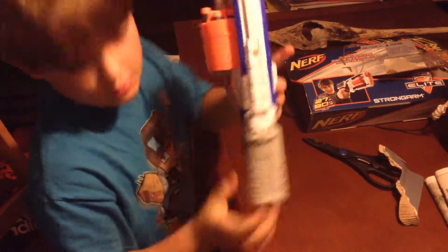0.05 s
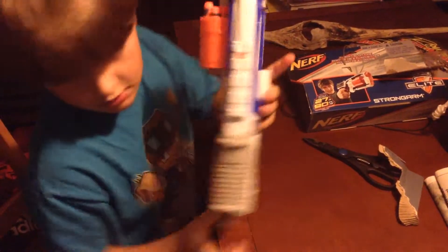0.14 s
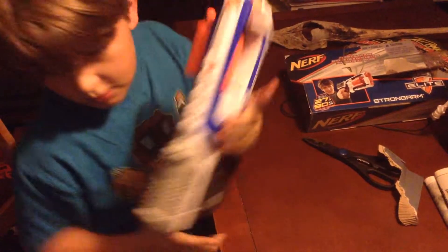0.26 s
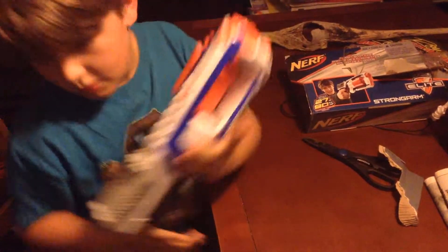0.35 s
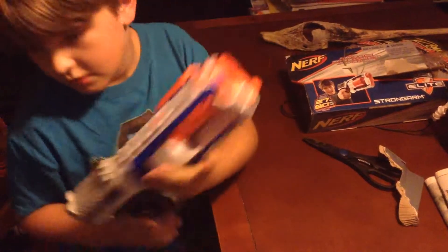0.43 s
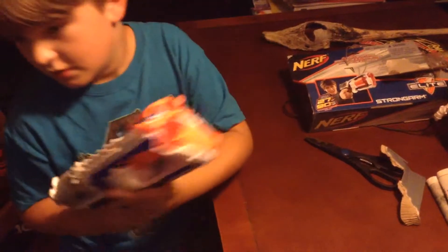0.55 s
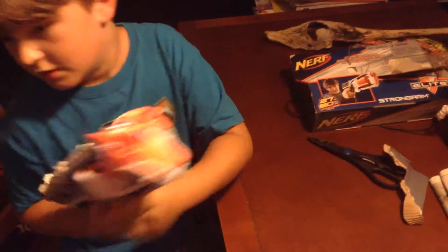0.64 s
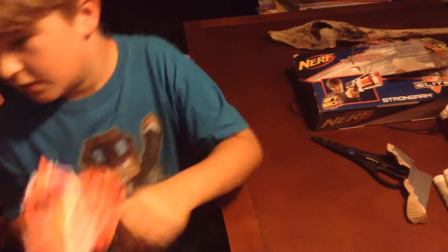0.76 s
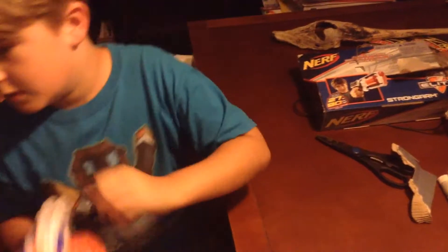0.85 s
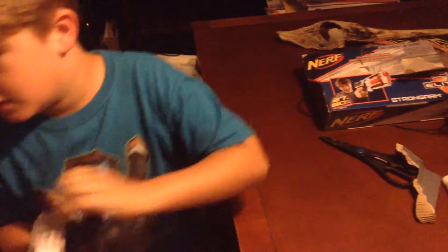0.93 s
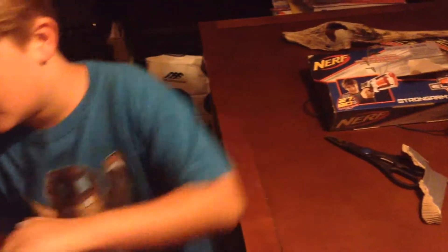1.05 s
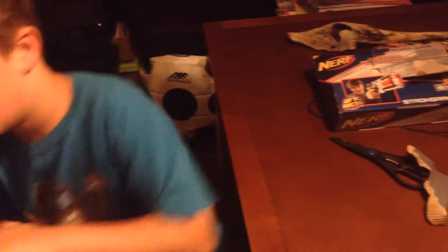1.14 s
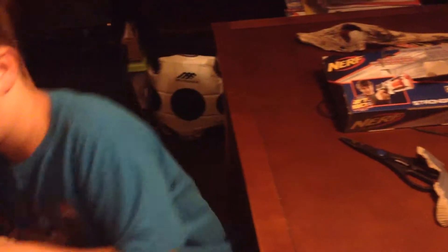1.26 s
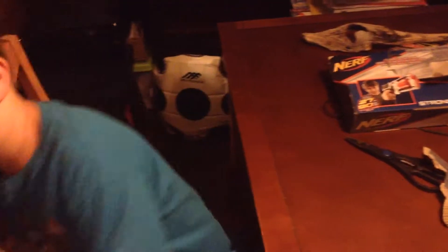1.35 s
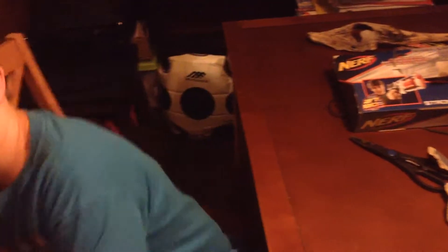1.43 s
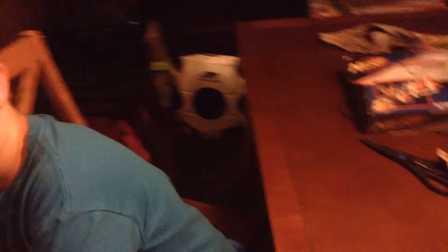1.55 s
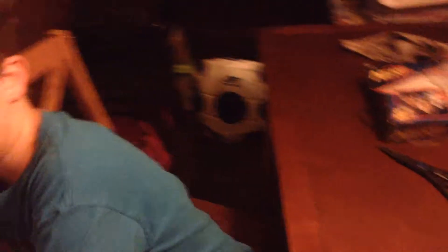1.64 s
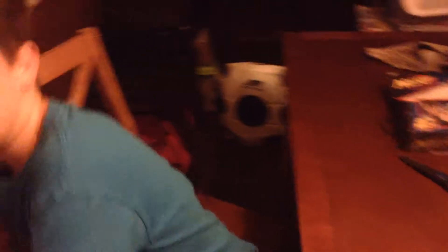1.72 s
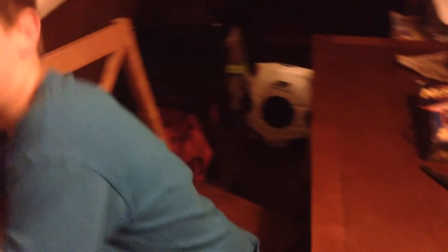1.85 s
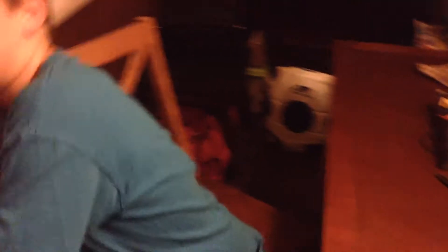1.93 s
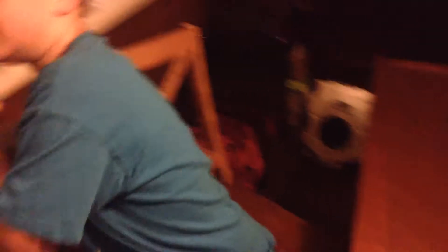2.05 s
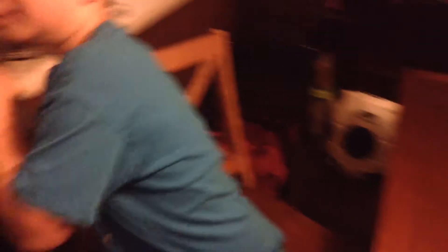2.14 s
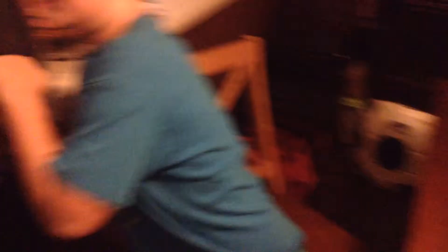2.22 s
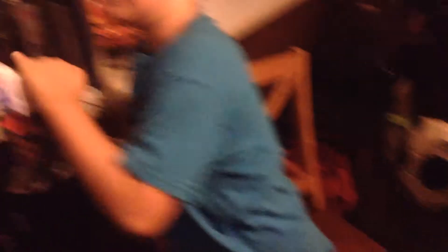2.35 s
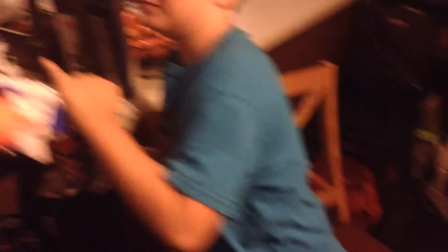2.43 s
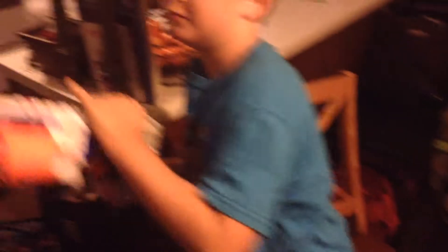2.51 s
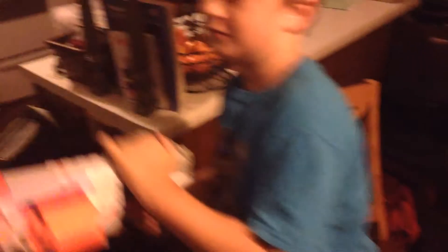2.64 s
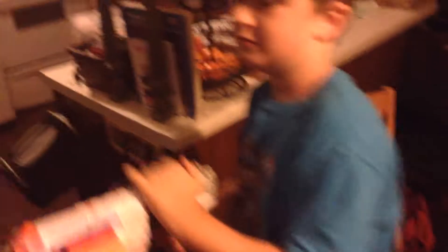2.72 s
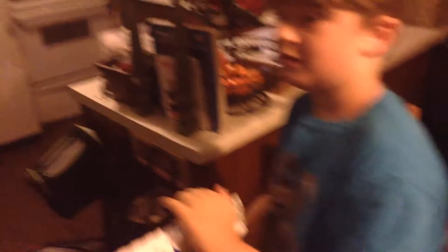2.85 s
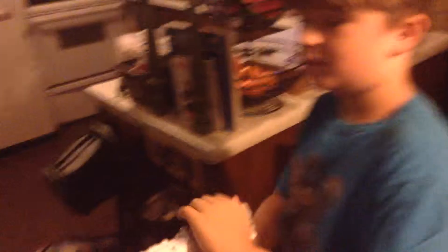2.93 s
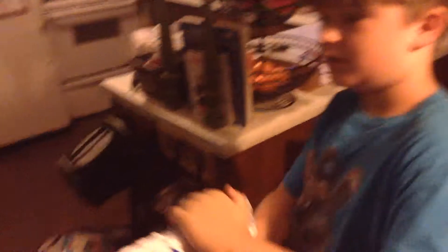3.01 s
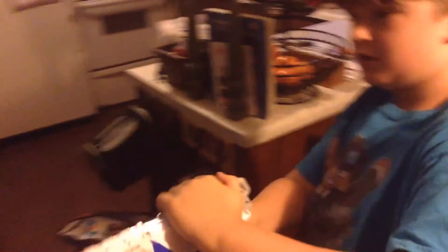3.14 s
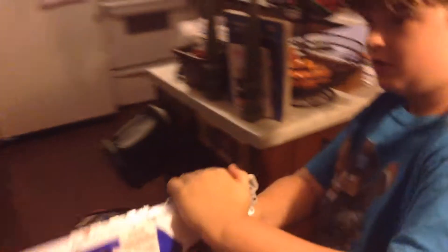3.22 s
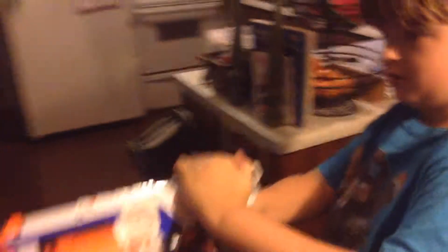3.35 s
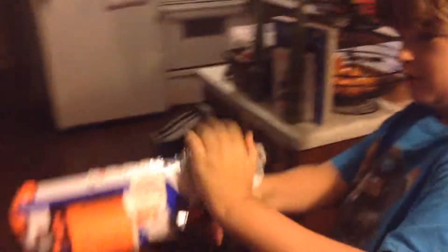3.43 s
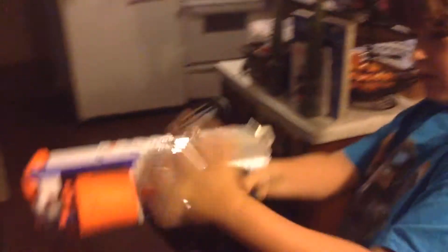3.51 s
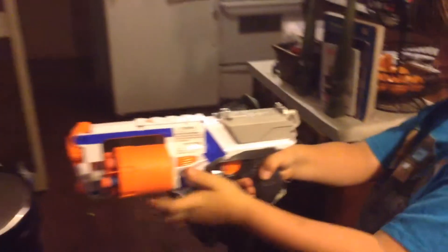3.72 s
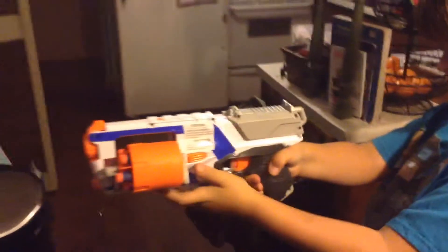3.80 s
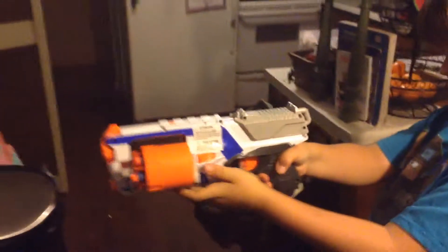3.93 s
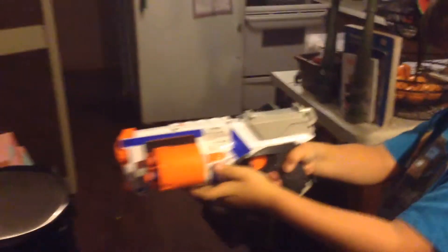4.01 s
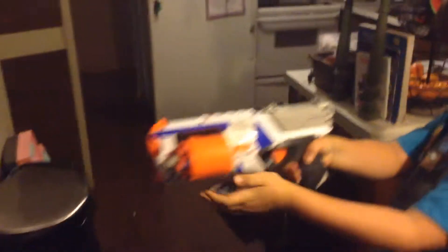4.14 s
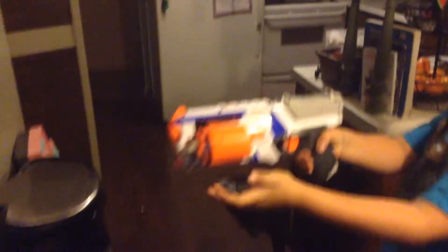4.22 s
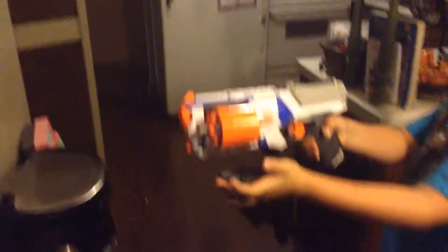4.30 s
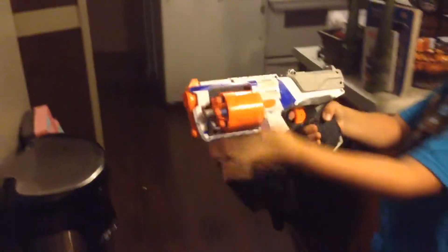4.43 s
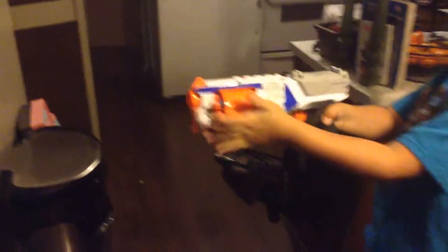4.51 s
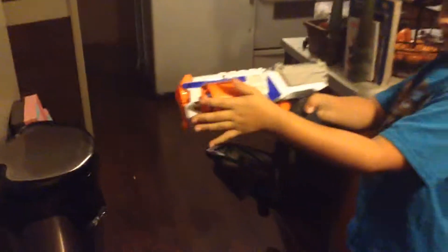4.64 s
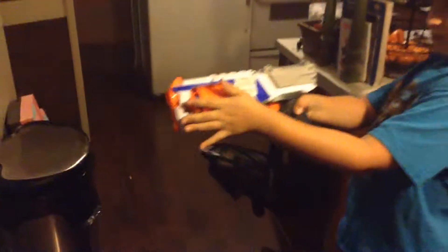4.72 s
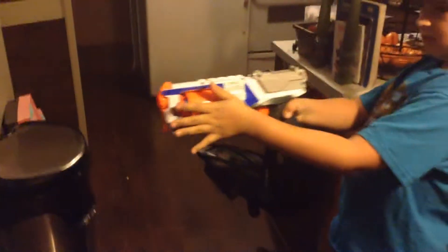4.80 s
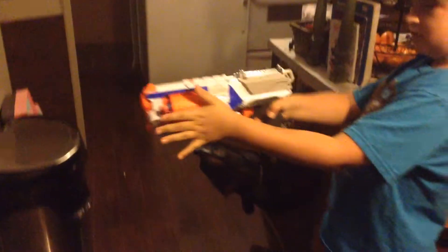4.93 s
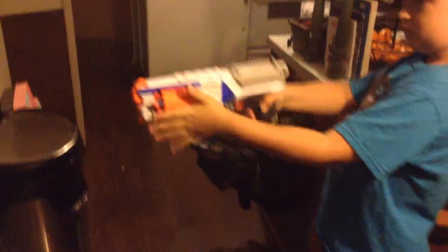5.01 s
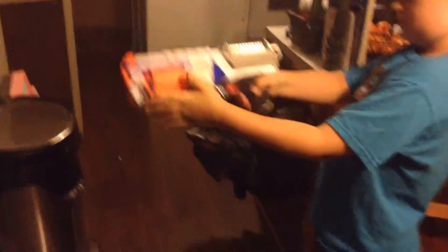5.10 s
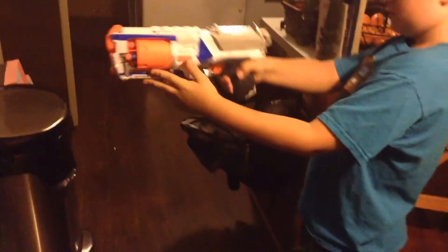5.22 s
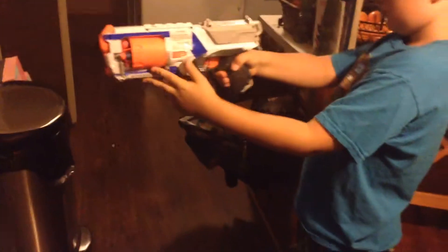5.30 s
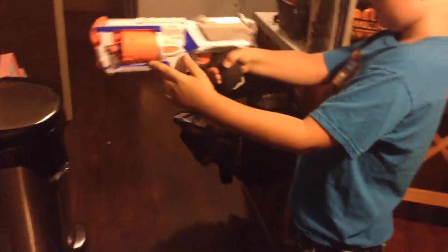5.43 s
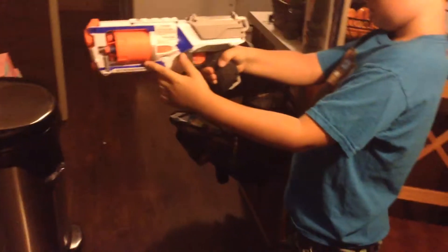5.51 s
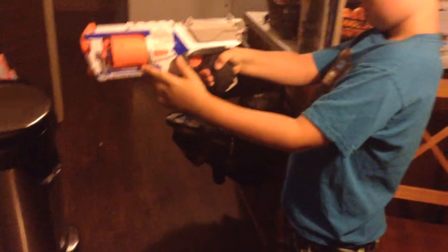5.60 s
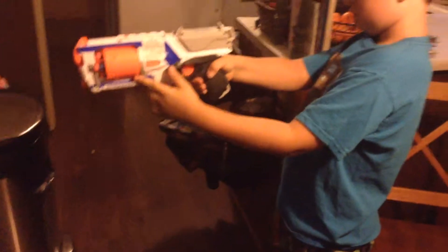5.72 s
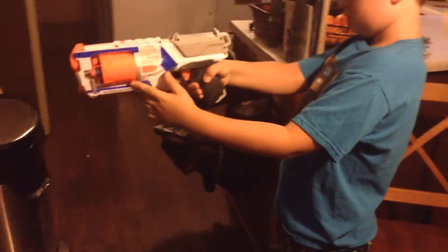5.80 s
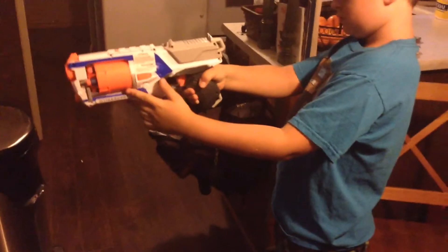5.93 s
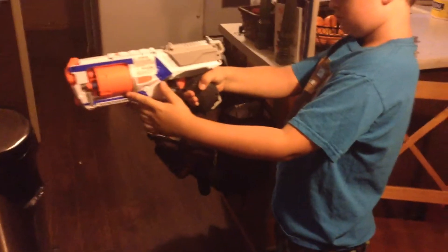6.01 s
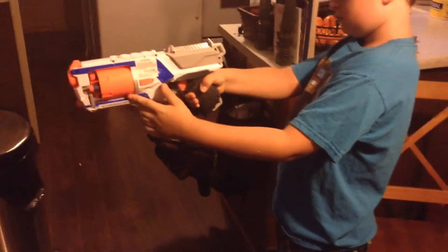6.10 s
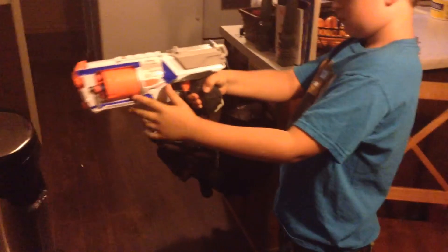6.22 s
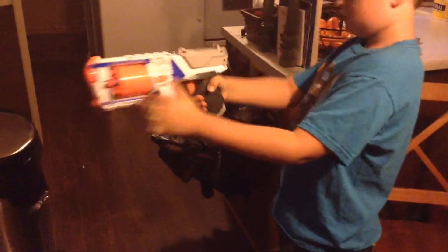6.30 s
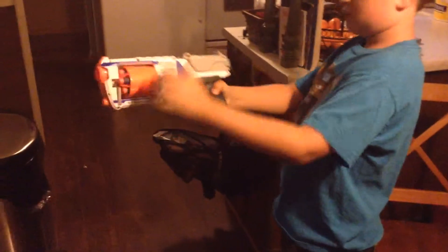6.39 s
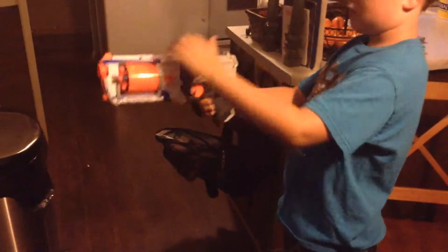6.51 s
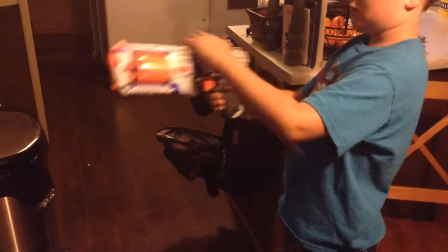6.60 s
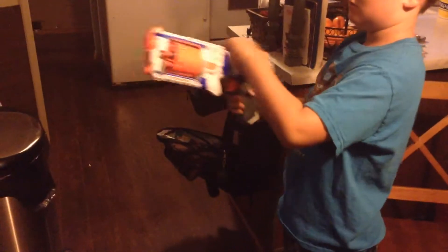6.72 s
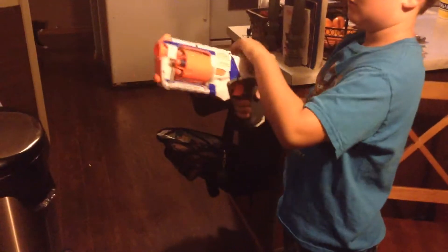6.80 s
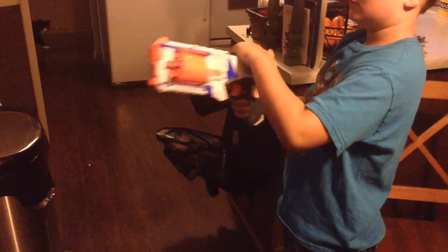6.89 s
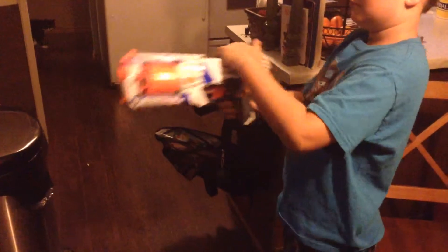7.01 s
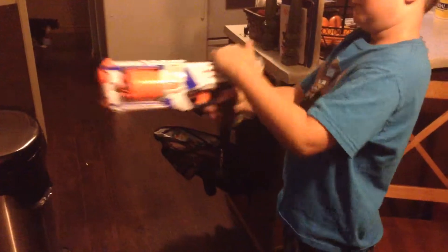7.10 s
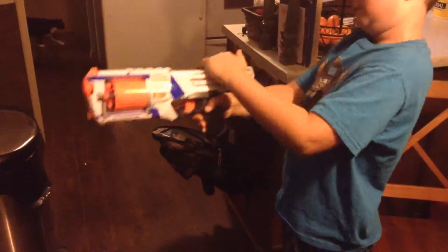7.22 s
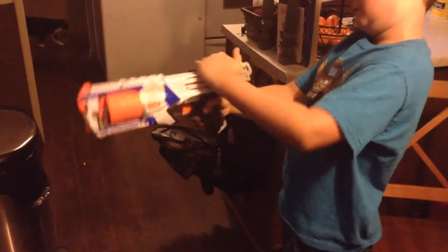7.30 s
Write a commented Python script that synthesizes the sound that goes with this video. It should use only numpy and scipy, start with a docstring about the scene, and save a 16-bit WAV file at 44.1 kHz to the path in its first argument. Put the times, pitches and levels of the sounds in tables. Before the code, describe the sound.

Sharp plastic slams and a rattling cylinder catch sound in a hard-walled room, among small ticks, brushing hands and quiet room tone.

```python
"""Loud plastic clacks, light ticks, scrapes and soft bumps are heard in a kitchen, over quiet room tone.
A child handles a foam-dart revolver: the slide, latch, cylinder and plunger slam, and loose parts tick.
Each blow is a short burst of chattering noise that rings the hollow shell and the part that is struck.
Scrapes and brushing are uneven noise; bumps ring one dull tone; the phone's case clicks without echo.
Hard walls give every sound of the blaster and hands a short bright tail."""
import sys
import numpy as np
from scipy import signal
from scipy.fft import rfft, irfft
from scipy.io import wavfile
from scipy.ndimage import uniform_filter1d

SR = 44100
rng = np.random.default_rng(int(sys.argv[2]) if len(sys.argv) > 2 else 0)


def file_out(sig):
    """Save sig as 16-bit WAV at sys.argv[1]."""
    # one column per channel
    cols = np.atleast_2d(sig).T
    # limit, then scale
    lim = np.clip(cols, -1, 1)
    pcm = np.round(lim * 32767).astype(np.int16)
    wavfile.write(sys.argv[1], SR, pcm)


N = 324135  # length in samples

# Thump, body, knock, crack and fizz bands of a blow. Each row: low edge in Hz, high edge in Hz.
BLOW_BANDS = [(150, 450), (450, 900), (900, 2800), (2800, 7000), (7000, 15000)]
# Slide, latch, cylinder and plunger slamming home.
# Each row: start in seconds, relative level in dB, tilt in dB per octave, chatter in seconds, own ring in Hz.
HARD_HITS = [(2.1399, -17.5, 1.2, 0.0076, 1320), (2.5596, -14, 3.5, 0.014, 560),
             (3.4456, -35, -0.2, 0.0043, 2800), (3.5516, -26, -0.64, 0.0052, 1030),
             (4.5636, -33, -3, 0.0058, 4600), (4.5696, -29, -0.3, 0.0066, 4670),
             (4.5861, -28, -1.1, 0.0048, 4580), (4.6098, -23, -1.6, 0.0048, 4650),
             (5.8600, -16, 0, 0.0091, 5130), (6.7120, -30, -3.3, 0.009, 4180),
             (6.7329, -23, -0.5, 0.0078, 4300), (7.1549, -31.5, 0.8, 0.0026, 2880),
             (7.2304, -17, 1, 0.0078, 1325), (7.2436, -18, 1.5, 0.0056, 720)]
# Ticks of loose parts, trigger and cylinder catch.
# Each row: start in seconds, relative level in dB, tilt in dB per octave, own ring in Hz.
LIGHT_HITS = [(0.0041, -38, 0.6, 1108), (0.0451, -50.5, 0.5, 2480), (0.6791, -60.5, 3, 4375),
              (0.8531, -48, -0.2, 2270), (0.8665, -49.5, -1.5, 2060), (0.9591, -46, 0.5, 1640),
              (1.1451, -47.5, -2.9, 630), (1.1511, -40, -0.4, 663), (1.3221, -50, -3.5, 4300),
              (1.3851, -50.5, -0.6, 1315), (1.5041, -47.5, 3.3, 1360), (1.7771, -50, -2, 594),
              (1.8651, -45, 1.2, 2700), (1.8861, -41, 0.1, 2650), (2.0571, -46, -2.5, 826),
              (2.3071, -49.5, 4, 815), (2.3505, -46, -1.5, 1480), (2.3641, -39.5, 2.8, 980),
              (2.3931, -44.5, 1, 1200), (2.4661, -45, 3, 1070), (2.4851, -45, -1.4, 990),
              (2.5171, -55, -4, 1400), (2.8760, -40.5, 0.6, 504), (3.0971, -51.5, -3.5, 650),
              (3.1761, -45.5, 0.4, 3480), (3.7215, -48, 1.5, 2080), (4.0971, -52, 2.5, 2350),
              (4.2111, -53, 0.8, 3100), (5.1051, -55.5, -1.5, 4000), (5.2911, -57.5, -1.8, 1090),
              (5.3511, -53, -1.5, 3515), (5.3611, -49.5, 2.8, 1665), (5.7151, -54.5, 4.5, 4740),
              (6.2351, -54, 2.5, 5300), (6.5651, -62.5, 5.5, 8565), (6.9561, -54, 1, 4440),
              (7.0561, -48, -1, 670)]
# Soft bumps of hands, grip and feet. Each row: start in seconds, relative peak in dB, pitch in Hz.
THUDS = [(0.02, -37, 337), (0.684, -35, 205), (1.676, -41.5, 290), (1.951, -31, 264), (2.064, -35.5, 312),
         (2.141, -33.5, 197), (2.59, -23.5, 453), (3.553, -31.5, 336), (4.611, -32, 348),
         (7.234, -38.5, 270), (2.883, -29, 335), (2.919, -29, 430), (4.114, -41, 216), (4.254, -40.5, 221),
         (4.873, -38.5, 204)]
# Resonances of the plastic shell. Each row: pitch in Hz, width in Hz.
SHELL_MODES = [(520, 56), (980, 89), (1370, 28), (1580, 55), (2300, 40), (2900, 47), (4120, 320),
               (4330, 18), (5220, 190), (5780, 26), (6440, 340), (7430, 790), (8280, 41), (9810, 21)]
# Tone colour of plastic. Each row: frequency in Hz, relative level in dB.
PLASTIC_COLOUR = [(29, -70), (50, -55), (262, -11.5), (434, -1), (501, -1.5), (652, -0.5), (1050, -2.5),
                  (1160, -1), (1590, -2), (1700, 0.5), (2330, 1), (3180, 1), (5140, 2), (10100, -2),
                  (15500, -17.5)]
# The slide and its catches scraping along their rails, one list of points for each stroke.
# Each point: time in seconds, relative level in dB.
SLIDE_STROKES = [
    [(2.120, -56), (2.140, -28)],
    [(2.26, -68), (2.34, -42.5), (2.55, -47)],
    [(3.40, -64), (3.446, -52)],
    [(3.49, -46), (3.55, -46)],
    [(6.698, -71), (6.714, -31.5)],
    [(6.89, -55.5), (7.09, -51), (7.16, -33), (7.23, -45)],
]
# Tone colour of the scraping. Each row: frequency in Hz, relative level in dB.
SCRAPE_COLOUR = [(88, -34), (150, -20.5), (346, -2.5), (509, -2.5), (583, 0), (668, 4), (2500, -3.5),
                 (2860, 1), (4650, -4.5), (9180, -11), (15500, -28)]
# Hands and shirt brushing the blaster. Each row: start in seconds, length in seconds, relative level in dB.
HAND_STROKES = [(0.04, 0.35, -58), (0.434, 0.86, -61.5), (1.302, 0.34, -55.5), (1.696, 0.33, -56),
                (3.01, 0.44, -59), (4.704, 0.34, -56.5), (6.422, 0.14, -52)]
# Tone colour of the brushing. Each row: frequency in Hz, relative level in dB.
BRUSH_COLOUR = [(59, -9), (100, -33), (146, -33), (326, -0.5), (394, -5), (576, 2.5), (861, -10.5),
                (1960, -4.5), (2870, -8.5), (8770, -6.5), (15500, -32)]
# Echo of the kitchen. Each row: frequency in Hz, seconds to fade by 60 dB.
KITCHEN_FADES = [(200, 0.13), (550, 0.36), (1400, 0.37), (4000, 0.34), (8000, 0.35), (14000, 0.25)]
# Tone colour of the room tone. Each row: frequency in Hz, relative level in dB.
ROOM_COLOUR = [(30, -17), (80, -28), (115, -12), (160, -3), (250, -1.5), (350, -1), (500, -7), (900, -8),
               (2000, -9.5), (4000, -13.5), (7000, -14.5), (11000, -21), (15500, -24.6)]
# Balance of a hard and of a light blow. Each entry: relative level in dB of one blow band, lowest first.
HARD_BALANCE = [-35, -13, -7, -3, -5]
LIGHT_BALANCE = [-22.5, -5, 0, 0, -6.5]
# Darts and cylinder rattling while the blaster is moved.
# Each row: start in seconds, end in seconds, lowest relative level in dB.
RATTLES = [(0.543, 0.8, -60.5), (5.139, 5.3, -63)]
# Fingers clicking on the phone's case. Each row: start in seconds, peak in dB, centre in Hz.
CASE_CLICKS = [(1.491, -25, 2190), (2.2385, -20, 4500), (2.8870, -21, 3000), (3.7217, -28.5, 2800)]

# the blaster keeps moving, so its sound meets the walls along several different paths
PATHS = 6
TOP_HZ = 15600  # the phone passes little above this
ROOM_DB = -56.5
# strength of the shell's modes and of the struck part's own ring, against the bare tick (dB)
SHELL_DB, HARD_RING_DB, LIGHT_RING_DB = 0, -4, 7
# a sharper contact tilts the bands about this pitch; bands near the own ring, in octaves, stand out
TILT_PIVOT_HZ, RING_SPAN_OCT = 3130, 0.75
RING_LIFT_DB = 6
LIGHT_CHATTER_S = 0.0027
RATTLE_SCATTER_DB = 3
# a brushing stroke peaks after this share of its length; it starts and ends this far under its peak
BRUSH_PEAK_SHARE, BRUSH_EDGE_DB = 0.14, 2


def undb(db):
    """Turn decibels into gain."""
    return 10 ** (np.asarray(db) / 20)


def unit(x):
    """Scale a sound to an rms of 1."""
    return x / np.sqrt(np.mean(x ** 2))


def fade(t, t60):
    """Exponential decay that loses 60 dB in t60 seconds."""
    return np.exp(-np.log(1000) * t / t60)


def on_log_axis(hz, points):
    """Read (Hz, value) points at any frequency, along a logarithmic pitch scale."""
    f, value = np.transpose(points)
    return np.interp(np.log(np.maximum(hz, 1)), np.log(f), value)


def colour(x, points, size=4096):
    """Filter with the gain of (Hz, dB) points, never sounding before its input."""
    gain = undb(on_log_axis(np.fft.rfftfreq(size, 1 / SR), points))
    # folding the cepstrum puts the filter's response after time zero
    cepstrum = irfft(np.log(gain))
    cepstrum[1:size // 2] *= 2
    cepstrum[size // 2 + 1:] = 0
    response = irfft(np.exp(rfft(cepstrum)))
    return signal.fftconvolve(x, response)[:len(x)]


def add(track, s, sound):
    """Mix a sound into a track at time s."""
    start = max(int(s * SR), 0)
    track[start:start + len(sound)] += sound[:N - start]


def walk(rate):
    """Slow random wandering with an rms of 1, from `rate` new values a second."""
    k = int(SR / rate)
    steps = np.repeat(rng.standard_normal(N // k + 1), k)
    smooth = uniform_filter1d(uniform_filter1d(steps, k), k)
    return unit(smooth[:N])


def grains(count, spread_db):
    """Dense tiny contacts, a few of them much harder than the rest."""
    force = undb(spread_db * rng.standard_normal(count))
    return unit(rng.standard_normal(count) * force)


def resonance(t, hz, width_hz):
    """A struck resonance: a decaying tone, with gain near 1 at its centre."""
    decay = np.exp(-np.pi * width_hz * t)
    return 2 * np.pi * width_hz / SR * decay * np.cos(2 * np.pi * hz * t)


def shell_response(modes, own_hz, own_db, own_width_hz=26, own_q=110):
    """One contact: a sharp tick, the shell's modes as this spot excites them, and the part's own ring."""
    t = np.arange(modes.shape[1]) / SR
    shell = undb(SHELL_DB) * rng.uniform(0, 0.89, len(modes)) @ modes
    own = undb(own_db) * resonance(t, own_hz, own_width_hz + own_hz / own_q)
    tick = signal.unit_impulse(len(t))
    return colour(tick + shell + own, PLASTIC_COLOUR)


def band_levels(balance, db, tilt_db, own_hz):
    """Level of each band of a blow from its strength, its sharpness and the part that is struck."""
    centre_hz = np.sqrt(np.prod(BLOW_BANDS, axis=1))
    near_ring = np.exp(-(np.log2(centre_hz / own_hz) / RING_SPAN_OCT) ** 2)
    tilt = tilt_db * np.log2(centre_hz / TILT_PIVOT_HZ)
    return db + np.array(balance) + tilt + RING_LIFT_DB * near_ring


def blow(response, band_db, chatter_s, settle_t60, spread_db, rise_s=0.00039, shortest_s=0.013):
    """Two parts meet, chatter and settle; filtering then brings each band towards its wanted level."""
    size = len(response)
    t, hz = np.arange(size) / SR, np.fft.rfftfreq(size, 1 / SR)
    contact = (1 - np.exp(-t / rise_s)) * fade(np.maximum(t - chatter_s, 0), settle_t60)
    sound = signal.fftconvolve(contact * grains(size, spread_db), response)[:size]
    # power per frequency while the contact lasts
    power = 2 * np.abs(rfft(sound)) ** 2 / size / (max(chatter_s, shortest_s) * SR)
    tint = []
    for (lo, hi), db in zip(BLOW_BANDS, band_db):
        present_db = 10 * np.log10(power[(hz >= lo) & (hz < hi)].sum())
        tint.append((np.sqrt(lo * hi), db - present_db))
    return colour(sound, tint)


def blows(hits, balance, own_db, settle_t60, spread_db, count, size=6000):
    """Play a list of blows, each touching at `count` spots that sound along different room paths."""
    out, t = np.zeros((PATHS, N)), np.arange(size) / SR
    modes = np.array([resonance(t, hz, width) for hz, width in SHELL_MODES])
    for s, db, tilt_db, chatter_s, own_hz in hits:
        band_db = band_levels(balance, db, tilt_db, own_hz)
        for path in rng.permutation(PATHS)[:count]:
            response = shell_response(modes, own_hz, own_db)
            add(out[path], s, blow(response, band_db, chatter_s, settle_t60, spread_db))
    return out / np.sqrt(count)


def rubbing(strokes, spectrum, gain_db, spread_db, uneven_db, slip_rate, edge_size=900):
    """Friction: tiny slips that come in uneven spurts while a stroke lasts."""
    t, pressure = np.arange(N) / SR, np.zeros(N)
    for stroke in strokes:
        s, db = np.transpose(stroke)
        pressure += undb(np.interp(t, s, db)) * (t >= s[0]) * (t <= s[-1])
    spurts = undb(uneven_db * walk(slip_rate))
    slips = colour(grains(N, spread_db) * spurts, spectrum)
    # smoothing softens the start and end of each stroke
    return undb(gain_db) * uniform_filter1d(pressure, edge_size) * unit(slips)


def room_tone():
    """The quiet rumble and hiss of the house: coloured noise swelling very slightly."""
    noise = unit(colour(rng.standard_normal(N), ROOM_COLOUR))
    return undb(ROOM_DB + .5 * walk(3.5)) * noise


def light_hits(tilt_db=2.2, ring_hz=1500, ring_spread_oct=0.55, count=3):
    """List the distinct ticks, plus a few faint ones scattered over each spell of rattling."""
    hits = list(LIGHT_HITS)
    for start, end, db in RATTLES:
        for k, (when, force, part) in enumerate(rng.random((count, 3))):
            s = start + (end - start) * (k + when) / count
            own_hz = ring_hz * 2 ** (ring_spread_oct * part)
            hits.append((s, db + RATTLE_SCATTER_DB * force, tilt_db, own_hz))
    return [(s, db, tilt, LIGHT_CHATTER_S, hz) for s, db, tilt, hz in hits]


def light_ticks():
    """Loose parts touch with short chatter, and their own ring is strong."""
    return blows(light_hits(), LIGHT_BALANCE, LIGHT_RING_DB, settle_t60=0.046, spread_db=4, count=2)


def bumps(gain_db=-6, scuff_t60=0.056, push_s=0.012, q=2.2, size=6000):
    """A soft, scuffing push excites one low, well damped resonance."""
    out, t = np.zeros(N), np.arange(size) / SR
    push = (1 - np.exp(-t / push_s)) * fade(t, scuff_t60)
    for s, db, hz in THUDS:
        body = resonance(t, hz, hz / q)
        thud = signal.fftconvolve(push * rng.standard_normal(size), body)[:size]
        # the soft contact passes little rumble or treble
        soft_band = signal.butter(4, [hz / 2, hz * 2], "band", fs=SR, output="sos")
        thud = signal.sosfilt(soft_band, thud)
        add(out, s, undb(db + gain_db) * thud / np.abs(thud).max())
    return out


def hands_brushing():
    """Hands and shirt rub the blaster: each stroke swells quickly, then eases off."""
    strokes = []
    for s, length, db in HAND_STROKES:
        edge_db = db - BRUSH_EDGE_DB
        peak_s = s + BRUSH_PEAK_SHARE * length
        strokes.append([(s, edge_db), (peak_s, db), (s + length, edge_db)])
    return rubbing(strokes, BRUSH_COLOUR, gain_db=1, spread_db=5.5, uneven_db=3.8, slip_rate=12)


def case_clicks(t60=0.01, q=1.0, size=1000):
    """A tiny snap through one broad resonance of the phone's case."""
    out, t = np.zeros(N), np.arange(size) / SR
    for s, db, hz in CASE_CLICKS:
        snap = fade(t, t60) * rng.standard_normal(size)
        click = signal.lfilter(*signal.iirpeak(hz, q, fs=SR), snap)
        add(out, s, undb(db) * click / np.abs(click).max())
    return out


def slide_scraping():
    """The slide and its catches rub along their rails in rapid, rough slips."""
    return rubbing(SLIDE_STROKES, SCRAPE_COLOUR, gain_db=-2, spread_db=7.5, uneven_db=1.5, slip_rate=81)


def hard_slams():
    """Moving parts slam home at several spots, so the shell and the struck part ring."""
    return blows(HARD_HITS, HARD_BALANCE, HARD_RING_DB, settle_t60=0.044, spread_db=2, count=4)


def kitchen(paths, wet_db, first_s=0.0015, build_s=0.001, spread_db=4, size=24000):
    """Direct sound plus, for each path, its own dense wall echoes, fading at a rate set by pitch."""
    t, hz = np.arange(size) / SR, np.fft.rfftfreq(size, 1 / SR)
    echoes, tails = rfft([grains(size, spread_db) for _ in paths]), 0
    # overlapping bands share the echoes, and each fades at its own rate
    for (_, t60), pick in zip(KITCHEN_FADES, np.eye(len(KITCHEN_FADES))):
        share = on_log_axis(hz, [(f, p) for (f, _), p in zip(KITCHEN_FADES, pick)])
        tails = tails + irfft(echoes * share) * fade(t, t60)
    tails *= 1 - np.exp(-np.maximum(t - first_s, 0) / build_s)
    tails /= np.linalg.norm(tails, axis=1, keepdims=True)
    wet = signal.oaconvolve(paths, tails, axes=1)[:, :N]
    return (paths + undb(wet_db) * wet).sum(axis=0)


def scene():
    """Blaster and hands sound in the kitchen, over its room tone."""
    paths = light_ticks() + hard_slams()
    paths[-1] += bumps()
    paths[1] += hands_brushing()
    paths[0] += slide_scraping()
    # the case clicks are too close for the room to answer
    mix = room_tone() + case_clicks() + kitchen(paths, wet_db=-0.5)
    return mix[None]


def record(dry):
    """The phone flattens peaks beyond full scale and cuts the top treble."""
    treble_cut = signal.ellip(10, .2, 80, TOP_HZ, fs=SR, output="sos")
    return signal.sosfilt(treble_cut, np.clip(dry, -1, 1))


dry = scene()
out = record(dry)
file_out(out)
```